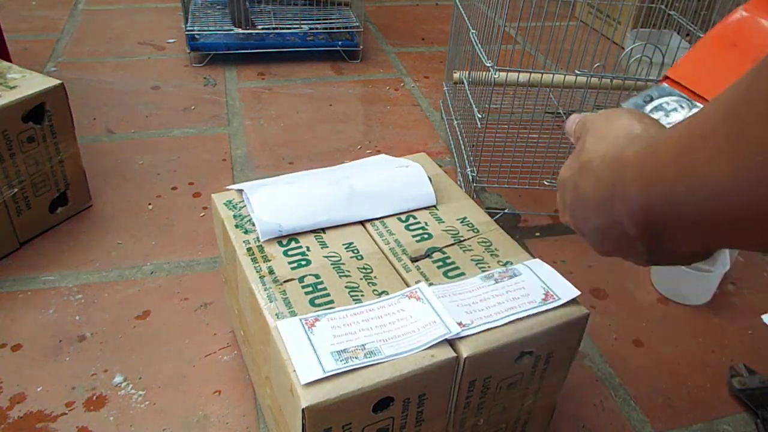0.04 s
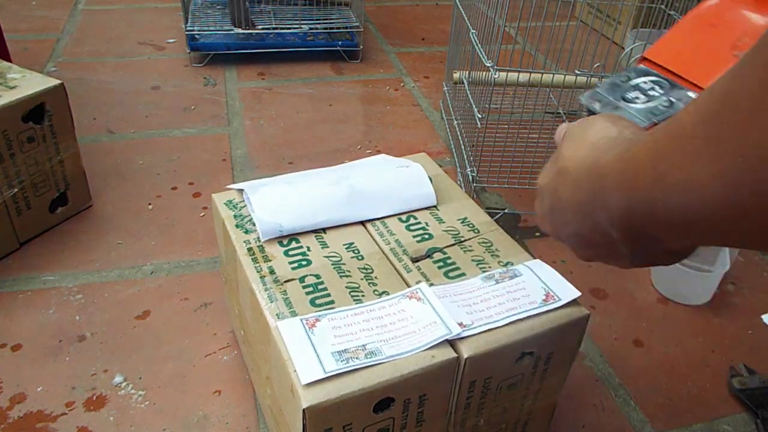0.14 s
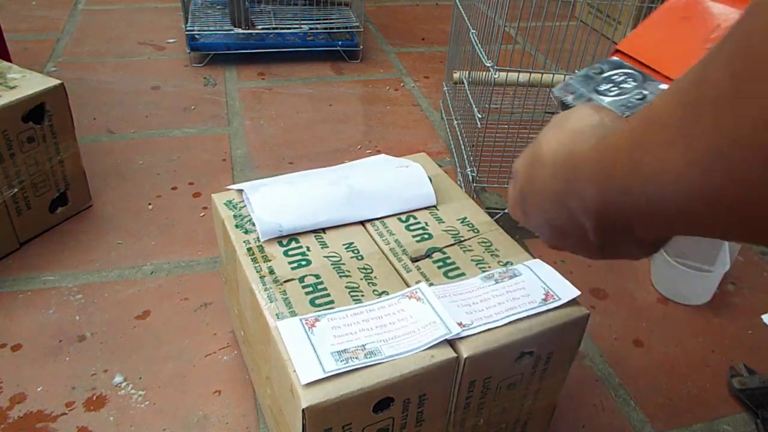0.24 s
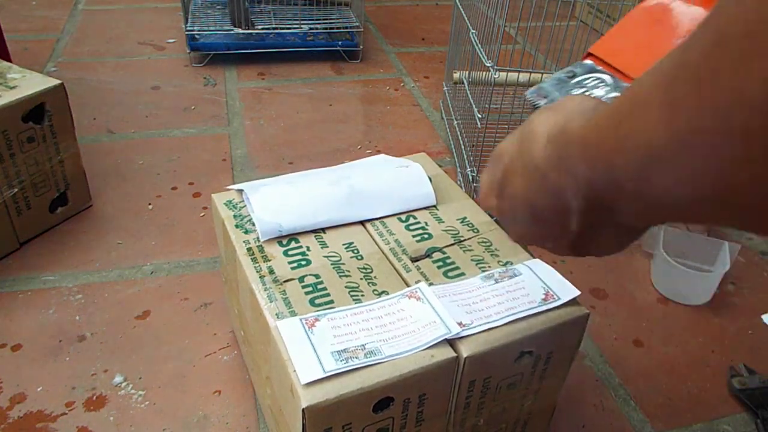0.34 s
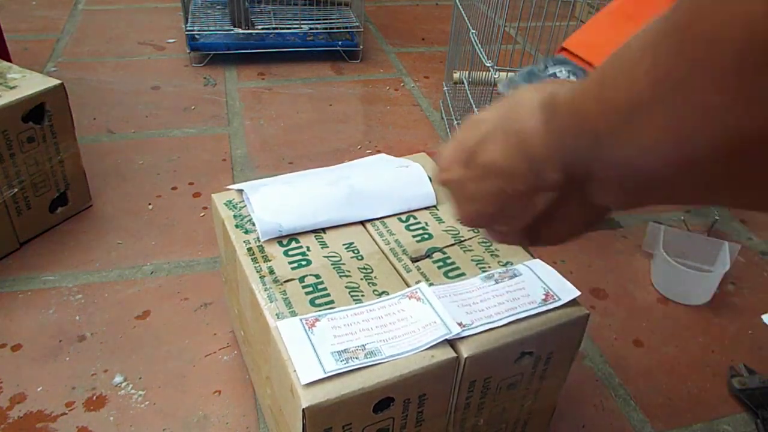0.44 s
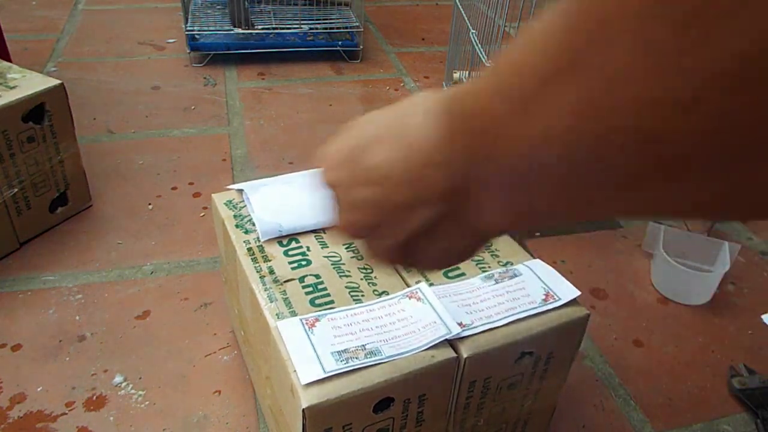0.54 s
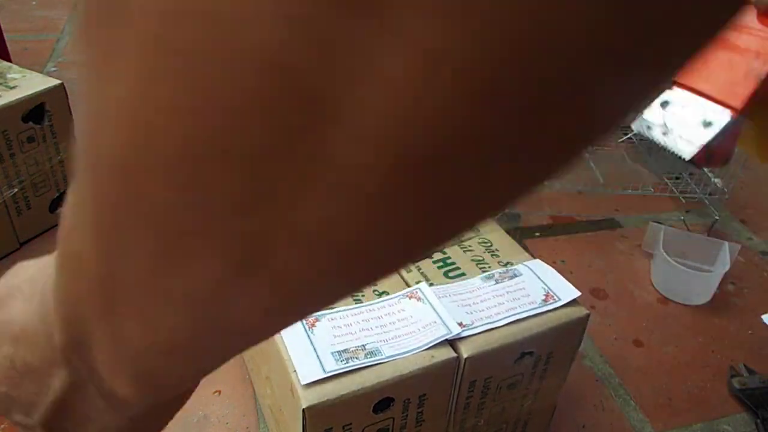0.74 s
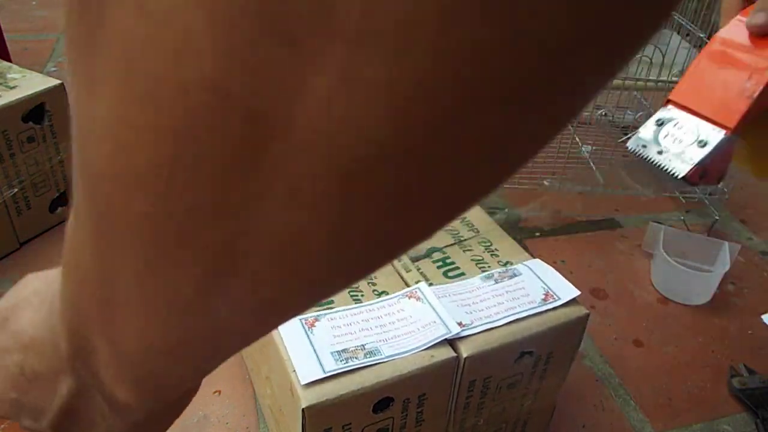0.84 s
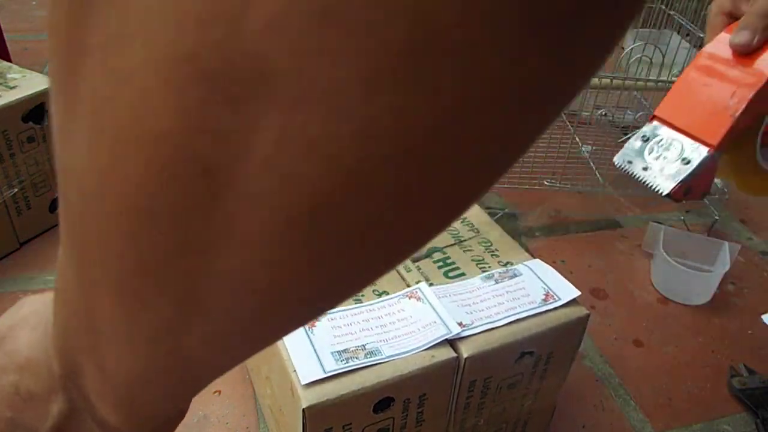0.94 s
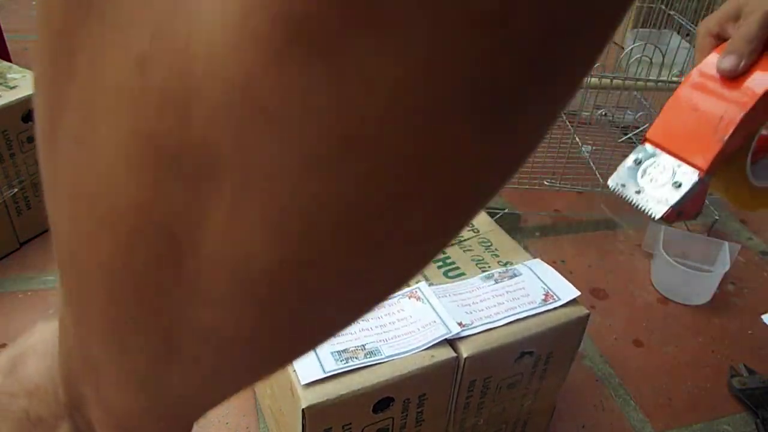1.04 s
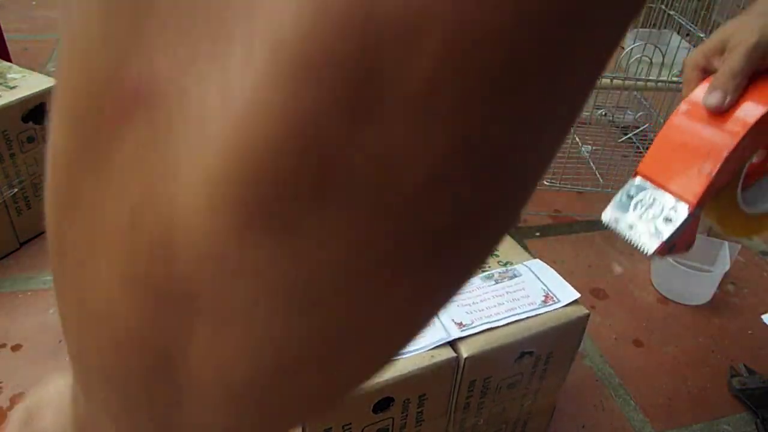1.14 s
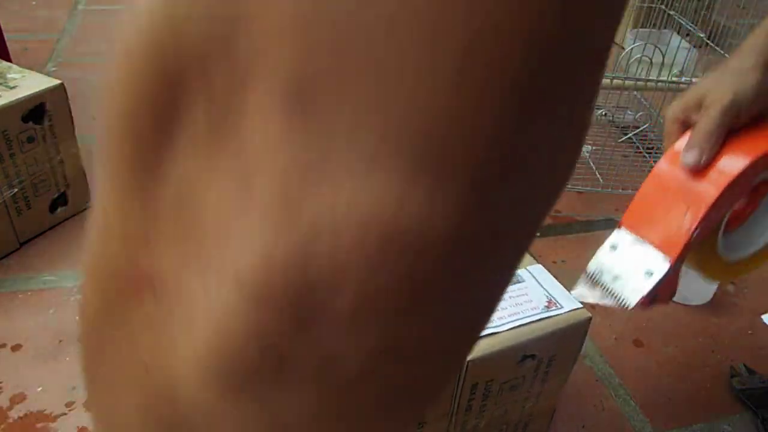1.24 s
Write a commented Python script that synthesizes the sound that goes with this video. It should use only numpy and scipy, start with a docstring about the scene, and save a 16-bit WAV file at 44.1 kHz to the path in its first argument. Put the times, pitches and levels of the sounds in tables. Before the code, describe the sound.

A loud, short screech of packing tape pulled from its roll, outdoors amid shrill constant insects

```python
"""A tiled yard with a chorus of insects lies under the whole scene; a hand brushes a handheld tape dispenser.
The roll of packing tape creaks above a cardboard box, then breaks loose in a few snaps: short runs of slip clicks.
It peels in one loud stick-slip rasp, three noise bands with their own levels, and rings the dispenser's frame.
Meanwhile the stretched film drones, an oscillator that gives way to flutter, and the microphone overloads a little.
The walls ring briefly as decaying noise; a soft brush follows and a faint rustle comes last."""
import sys
import numpy as np
from scipy import signal
from scipy.fft import rfft, irfft
from scipy.io import wavfile

SR = 44100
rng = np.random.default_rng(int(sys.argv[2]) if len(sys.argv) > 2 else 0)


def waveform_to_disk(signal):
    """Save audio, clipped to [-1, 1], as 16-bit WAV at the path in sys.argv[1]."""
    frames = np.transpose(np.atleast_2d(signal))
    scaled = np.clip(frames, -1, 1) * 32767
    samples = np.round(scaled).astype(np.int16)
    wavfile.write(sys.argv[1], SR, samples)


N = 57330  # length in samples, 1.3 s
T, HZ = np.arange(N) / SR, np.fft.rfftfreq(N, 1 / SR)


def amp(db):
    """Decibels to gain."""
    return 10 ** (np.asarray(db) / 20)


def unit(x):
    """Scales to rms 1."""
    return x / np.sqrt(np.mean(x ** 2) + 1e-20)


def read(points, hz):
    """Reads a table on a log-frequency axis."""
    f, value = np.transpose(points)
    return np.interp(np.log(hz + 1), np.log(f), value)


def colour(x, points):
    """Shapes a signal's spectrum by a table, at rms 1."""
    return unit(irfft(rfft(x) * amp(read(points, HZ)), N))


def drift(hz):
    """Random movement at rms 1, fading out above about the given rate."""
    return unit(irfft(rfft(rng.standard_normal(N)) * np.exp(-(HZ / hz) ** 2), N))


def pair(a, b, same):
    """Two channels of a given likeness from two unrelated signals."""
    same = np.clip(same, -1, 1)
    mid = rfft(a) * np.sqrt((1 + same) / 2)
    side = rfft(b) * np.sqrt((1 - same) / 2)
    return irfft(np.array([mid + side, mid - side]), N)


def gate(start, end, rise, fall):
    """Linear attack, hold and exponential release, all in seconds."""
    attack = np.clip((T - start) / rise, 0, 1)
    return attack * np.exp(-np.maximum(T - end, 0) / fall)


# stereo likeness of tape and air: (frequency [Hz], left-right likeness [0-1])
STEREO_LIKENESS = [(100, 0.96), (500, 1), (3000, .99), (6000, 0.94), (9000, 0.82), (14000, 0.69)]
SLIPS_PER_S, SLIP_JITTER = 620, .35  # centre rate [1/s] and its random spread [natural log]
SLIP_SPREAD_DB, SLIP_DECAY_S = 1.5, 0.00059
FIZZ = 0.34  # steady noise between slips, against burst envelope rms 1


def slips():
    """The glue sticks and slips unevenly; each slip is a click and a tiny burst of fizz."""
    rate = SLIPS_PER_S * np.exp(SLIP_JITTER * drift(250))
    turns = np.cumsum(rate) / SR
    onsets = np.diff(np.floor(turns), prepend=0) > 0
    clicks = onsets * amp(SLIP_SPREAD_DB * np.clip(rng.standard_normal(N), -2, 2))
    decay = np.exp(-1 / (SLIP_DECAY_S * SR))
    envelope = unit(signal.lfilter([1], [1, -decay], clicks)) + FIZZ
    mid_fizz, side_fizz = envelope * rng.standard_normal((2, N))
    mid = unit(mid_fizz) + 0.57 * unit(clicks)
    return pair(mid, 1.24 * unit(side_fizz), read(STEREO_LIKENESS, HZ))


# the long pull, levels before the trims:
# (time [s], body level [dB], low rasp level [dB], treble level [dB])
PULL = [(0.478, -31, -21, -44), (0.484, -12, -14, -23.5), (0.52, -9.5, -13, -26.5),
        (0.528, -12, -14.5, -23.5), (0.542, -9.5, -17.5, -28), (0.57, -13, -11, -26.5),
        (0.696, -12, -11.5, -21.5), (0.746, -13, -15, -20.5)]
# spectrum of the rasp before its bands are levelled: (frequency [Hz], level [dB])
RASP_COLOUR = [(120, -41), (200, -26.5), (293, -19.5), (399, -8.5), (564, -19), (755, -13.5), (890, -24),
               (1030, -11), (1330, -11), (1540, -3), (1840, -7.5), (2420, -7.5), (2600, -10), (3180, -7),
               (4920, -11.5), (5300, -7), (5910, -8.5), (12000, -22), (15500, -42)]
LOW_TRIM_DB, BODY_TRIM_DB, TREBLE_TRIM_DB = -3.5, -1, 2.5
LOW_HZ, TREBLE_HZ = 2950, 7110  # band crossovers
EDGE_S = 0.0033  # attack of pull and film


def peel():
    """The peeling glue rasps by stick-slip, its low part, body and treble each on their own level."""
    time, body_db, low_db, treble_db = np.transpose(PULL)
    spectrum = rfft(colour(slips(), RASP_COLOUR))
    low = 1 / (1 + (HZ / LOW_HZ) ** 10)
    treble = 1 - 1 / (1 + (HZ / TREBLE_HZ) ** 10)
    bands = [(low, low_db + LOW_TRIM_DB),
             (1 - low - treble, body_db + BODY_TRIM_DB),
             (treble, treble_db + TREBLE_TRIM_DB)]
    rasp = 0
    for band, db in bands:
        rasp = rasp + unit(irfft(spectrum * band, N)) * amp(np.interp(T, time, db))
    return rasp * gate(time[0] - EDGE_S, time[-1], EDGE_S, EDGE_S / 2)


# the tape breaking loose: (time [s], length [s], level [dB])
SNAPS = [(0.4225, .002, 0), (0.4263, 0.0031, -5.5), (0.432, 0.0065, -16), (0.4359, 0.0031, -6),
         (0.4409, 0.0047, -11), (0.4477, .002, -16), (0.4633, 0.0057, -5)]
# the roll creaking before the pull, and one faint late rustle: (time [s], length [s], level [dB])
CREAKS = [(0.254, 0.019, -37.5), (0.314, 0.015, -38), (0.334, 0.0088, -36), (0.344, 0.006, -36),
          (0.355, 0.005, -27.5), (0.396, 0.011, -30.5), (.405, 0.015, -27), (1.269, .028, -39)]
# spectrum of snaps, creaks and rustle: (frequency [Hz], level [dB])
SNAP_COLOUR = [(59, -86), (100, -55), (293, -38), (508, -19), (576, -6), (956, -33), (1130, -16.5),
               (1590, -8.5), (2420, -2.5), (2930, -3), (3540, 2), (4660, -7.5), (5510, 3), (6530, -6),
               (15500, -25.5)]


def snaps():
    """Short runs of slips as the roll creaks and gives way, and for the late rustle."""
    level = np.zeros(N)
    for start, length, db in SNAPS:
        level += amp(db) * gate(start, start + length, 0.0005, 0.0013)
    for start, length, db in CREAKS:
        level += amp(db) * gate(start, start + length, 0.0013, 0.0028)
    return level * colour(slips(), SNAP_COLOUR)


# the stretched film: (time [s], pitch [Hz], level [dB], roughness [0-1])
FILM = [(.48, 501, -38, 0.5), (.555, 450.2, -34, 0.6), (.59, 432.5, -29, 0.3), (.625, 401.3, -21, 0),
        (.655, 403.8, -16.5, 0.2), (.681, 390.6, -18, 0.07), (.695, 394.7, -22, 0.83),
        (.715, 419, -15.5, 0.93), (.745, 441, -22.5, 0.84)]
FLUTTER_HZ, OCTAVE_DB = 117, -18  # flutter rate; octave against fundamental


def film():
    """The free length of tape sinks in pitch, locks into a clean drone, then flutters as it rises."""
    time, *columns = np.transpose(FILM)
    hz, db, rough = (np.interp(T, time, column) for column in columns)
    phase, rough = 2 * np.pi * np.cumsum(hz) / SR, np.clip(rough, 0, 1)
    flutter = drift(FLUTTER_HZ) * np.cos(phase) + drift(FLUTTER_HZ) * np.sin(phase)
    clean = np.sqrt(2) * (np.sin(phase) + amp(OCTAVE_DB) * np.sin(2 * phase))
    drone = np.sqrt(1 - rough ** 2) * clean + rough * flutter  # equal-power blend
    return amp(db) * drone * gate(time[0], time[-1], EDGE_S, EDGE_S)


# modes of the dispenser's frame and blade, relative levels:
# (frequency [Hz], level [dB], time to fall 60 dB [s])
FRAME_MODES = [(1491, -12, 0.28), (1519, -4, 0.26), (1559, -1, 0.44), (1040, -9, 0.44), (1980, -22, .3),
               (2412, -5, 0.28), (2884, -3.5, 0.25)]
FRAME_GAIN = 0.5 * amp(-18)


def frame(x):
    """The rasp rings the dispenser's decaying modes, more as the tape tightens."""
    ring = np.zeros(N)
    for hz, db, t60 in FRAME_MODES:
        ring += amp(db - 60 * T / t60) * np.sin(2 * np.pi * hz * T)
    tension = np.interp(T, [.5, .66], [.2, 1])
    drive = x.mean(0) * tension
    return FRAME_GAIN * signal.fftconvolve(drive, ring / np.linalg.norm(ring))[:N]


# decay of the walls: (frequency [Hz], time to fall 60 dB [s])
WALL_DECAY = [(200, 0.35), (500, 0.42), (1500, 0.5), (4000, 0.49), (8000, 0.49), (15000, 0.33)]
WALL_DB, NEAR_DB = -9, -7.5
WALL_DELAY_S, WALL_WIDTH = 0.019, 0.13  # silence, then equally long fade-in; share of side signal


def room(x):
    """A few near reflections from box and floor, then the walls as noise decaying by frequency."""
    f, t, z = signal.stft(rng.standard_normal((2, N)), SR, nperseg=256)
    decay = amp(-60 * t / read(WALL_DECAY, f)[:, None])
    mid, side = signal.istft(z * decay, SR, nperseg=256)[1][:, :N]
    tail = np.array([mid + WALL_WIDTH * side, mid - WALL_WIDTH * side])
    tail = tail * np.clip(T / WALL_DELAY_S - 1, 0, 1)
    near = np.zeros(N)
    # six echoes of random polarity, 0.7 to 7 ms late
    near[rng.integers(30, 300, size=6)] = rng.choice([-1, 1], size=6) / np.sqrt(6)
    response = amp(WALL_DB) * tail / np.linalg.norm(tail[0]) + amp(NEAR_DB) * near
    return signal.fftconvolve(x, response, axes=1)[:, :N]


# soft brushes of the hand: (time [s], length [s], level [dB])
BRUSHES = [(0.037, 0.043, -43.5), (0.258, 0.06, -38.5), (0.325, 0.13, -40.5), (1.141, 0.072, -49.5)]
# spectrum of the brushes: (frequency [Hz], level [dB])
BRUSH_COLOUR = [(100, -14), (300, 4), (600, -3), (1000, 9), (1600, -4.5), (4000, -4.5), (12000, -38)]


def brushes():
    """The hand brushes over the dispenser: coloured noise in half-sine swells."""
    level = np.zeros(N)
    for start, length, db in BRUSHES:
        level += amp(db) * np.sin(np.pi * np.clip((T - start) / length, 0, 1))
    return level * colour(rng.standard_normal(N), BRUSH_COLOUR)


# insect bands: (frequency [Hz], full width at half power [Hz], level [dB])
INSECTS = [(4724, 193, -25), (4690, 390, -41.5), (7480, 820, -46.5), (5500, 460, -54.5), (10300, 450, -64)]
INSECT_LIKENESS = 0.76  # left-right


def insects():
    """Narrow noise bands shimmer like many insects trilling near one pitch; fainter ones sing higher."""
    out = 0
    for hz, width, db in INSECTS:
        band = .5 ** (2 * ((HZ - hz) / width) ** 2)
        voices = irfft(rfft(rng.standard_normal((2, N))) * band, N)
        out = out + amp(db) * unit(pair(*voices, INSECT_LIKENESS))
    return out


# spectrum of the yard's air, before its overall level: (frequency [Hz], level [dB])
AIR_COLOUR = [(20, -10.5), (42, 8), (85, -6), (170, -12), (330, -8.5), (520, -14.5), (950, -15),
              (1500, -22.5), (2800, -24), (4000, -19), (6500, -20), (9000, -30), (12000, -33), (15500, -47)]
# hum tones: (frequency [Hz], level [dB])
HUM = [(118, -56), (344.5, -51.5), (549, -62)]
AIR_DB, AIR_DRIFT_DB = -43, .8


def yard():
    """Low rumble and distant wash from coloured noise, and a faint hum of sines wavering in phase."""
    noise = pair(*rng.standard_normal((2, N)), read(STEREO_LIKENESS, HZ) - .05)
    out = colour(noise, AIR_COLOUR) * amp(AIR_DB + AIR_DRIFT_DB * drift(20))
    for hz, db in HUM:
        out = out + amp(db) * np.sqrt(2) * np.sin(2 * np.pi * hz * T + 0.44 * drift(2.4))
    return out


# stereo balance: (frequency [Hz], left minus right [dB])
LEAN = [(100, -2.5), (2500, -2), (5000, -1.2), (9000, 0), (14000, 3.5)]


def scene():
    """Tape and its reflections over the yard, leaning a little right, but left in the top treble."""
    rasp, drone = peel() + snaps(), film()
    tape = rasp + frame(rasp)
    mix = tape + drone + room(tape + 0.57 * drone) + brushes() + insects() + yard()
    balance = amp(np.array([[.5], [-.5]]) * read(LEAN, HZ))
    return irfft(rfft(mix) * balance, N)


CEILING, KNEE = 1.07, 5.2  # overload limit [amplitude]; higher knee bends more sharply
CUT_HZ = 15700


def record(dry):
    """The close microphone overloads softly, then a low-pass limits the band."""
    clipped = dry / (1 + abs(dry / CEILING) ** KNEE) ** (1 / KNEE)
    lowpass = signal.firwin(255, CUT_HZ, window=("kaiser", 8), fs=SR)
    return signal.oaconvolve(clipped, lowpass[None], "same")


dry = scene()
out = record(dry)
waveform_to_disk(out)
```